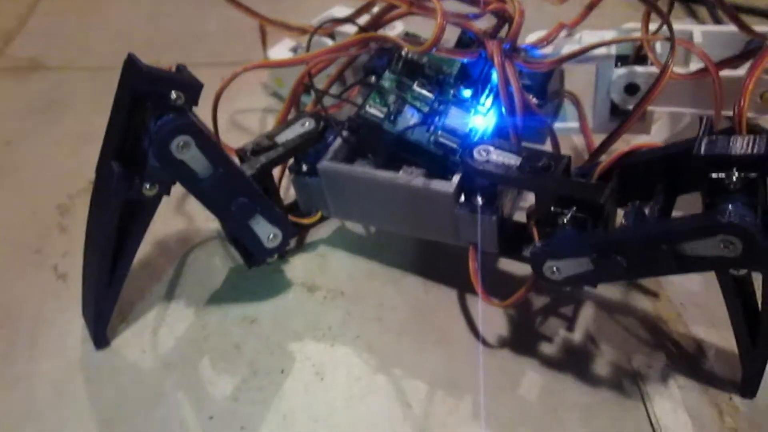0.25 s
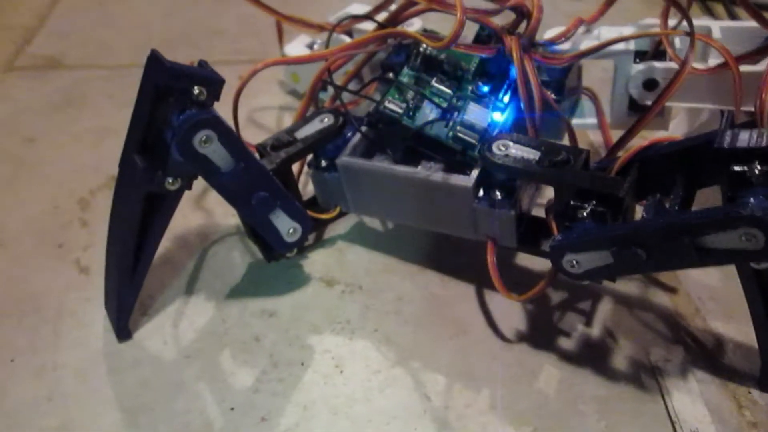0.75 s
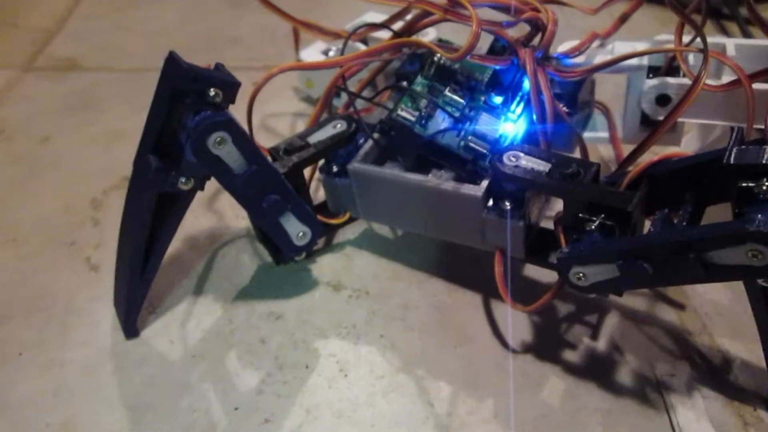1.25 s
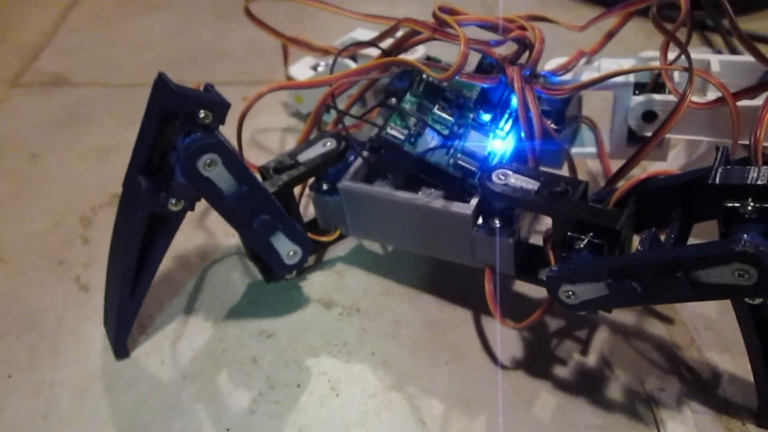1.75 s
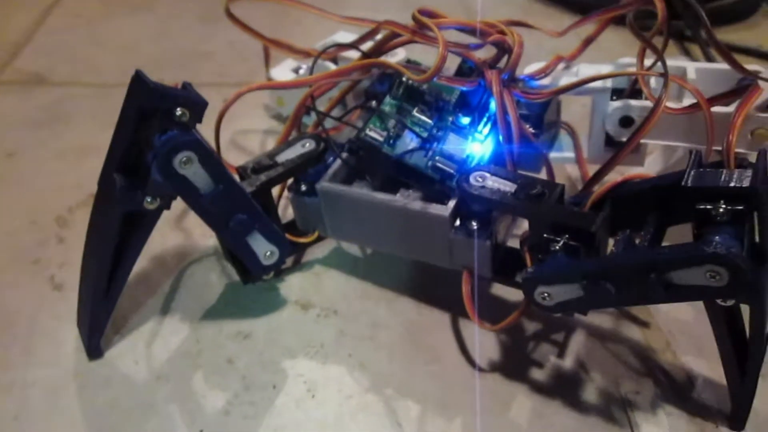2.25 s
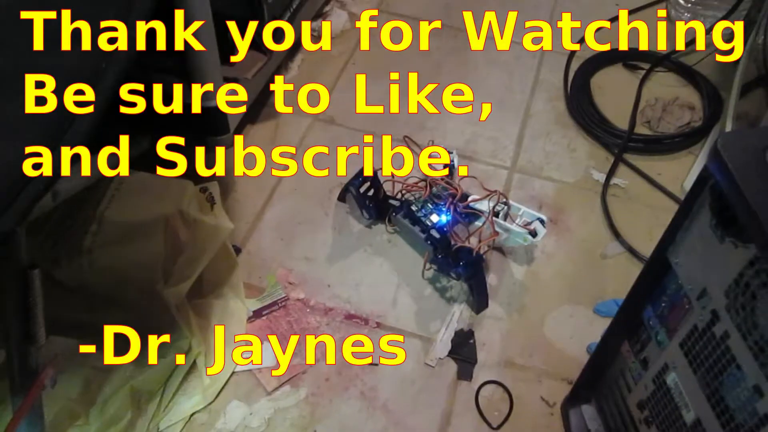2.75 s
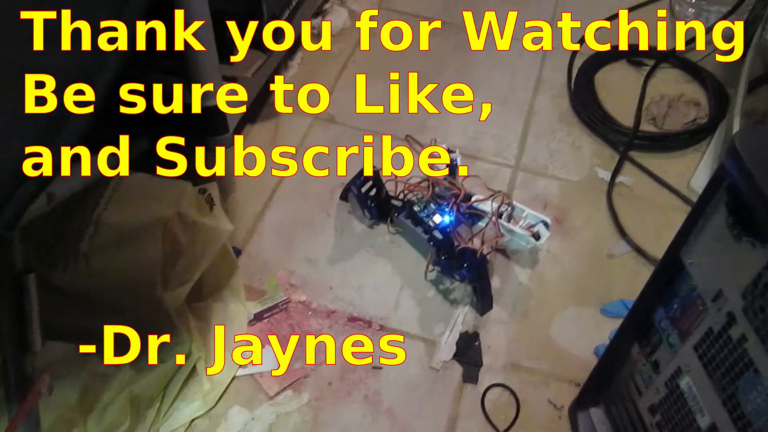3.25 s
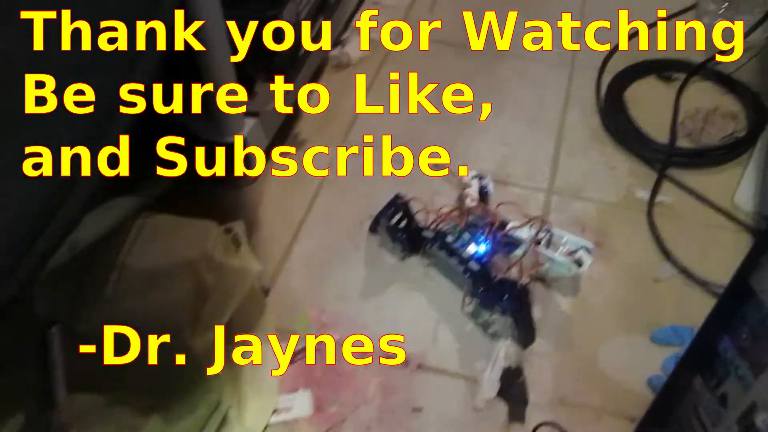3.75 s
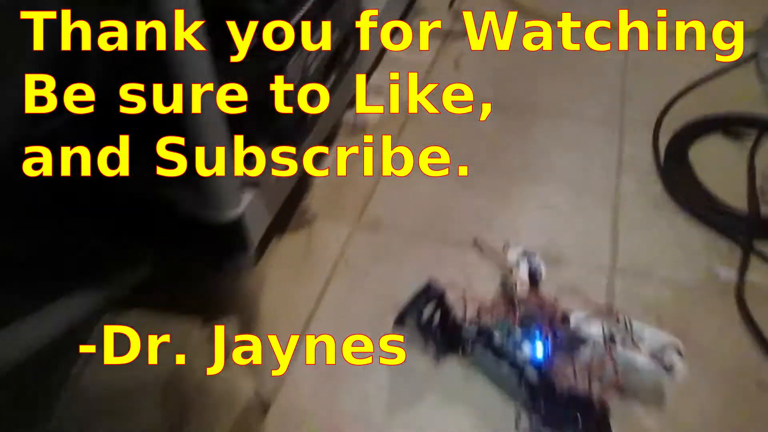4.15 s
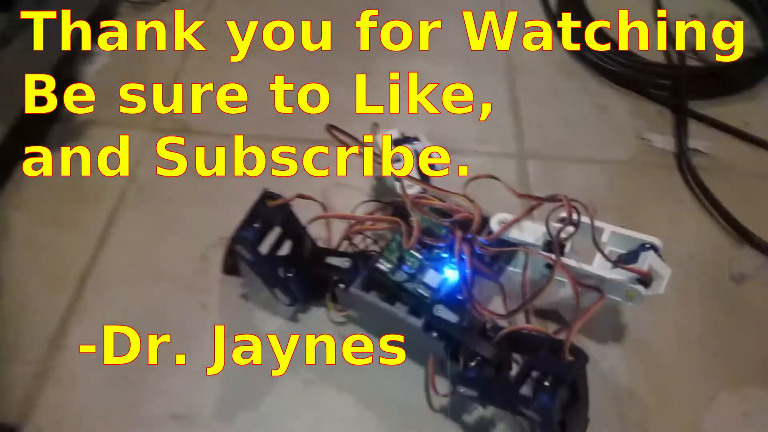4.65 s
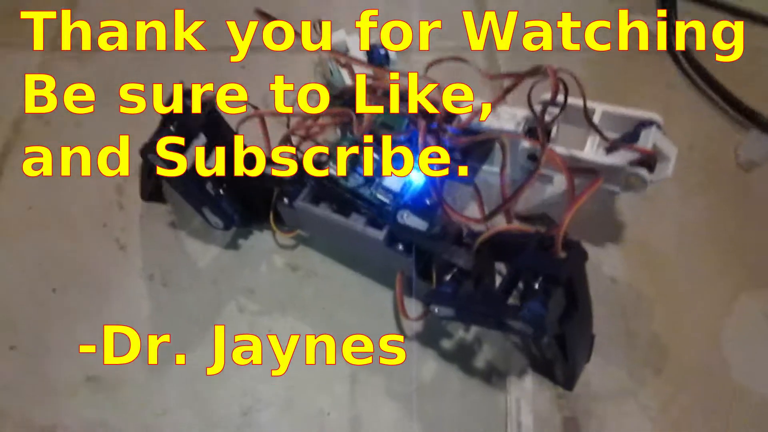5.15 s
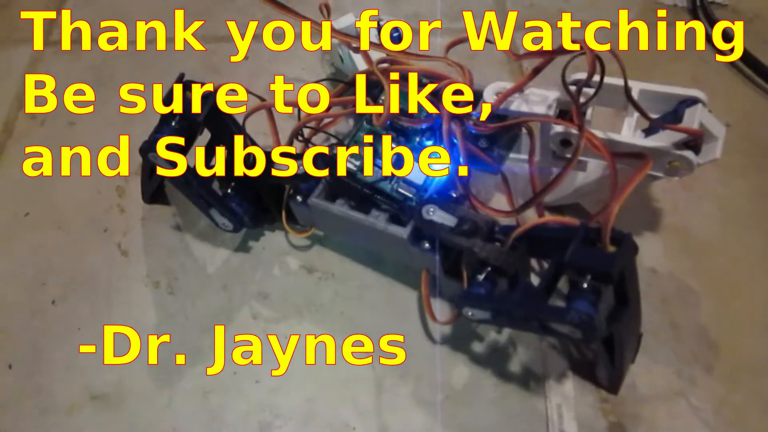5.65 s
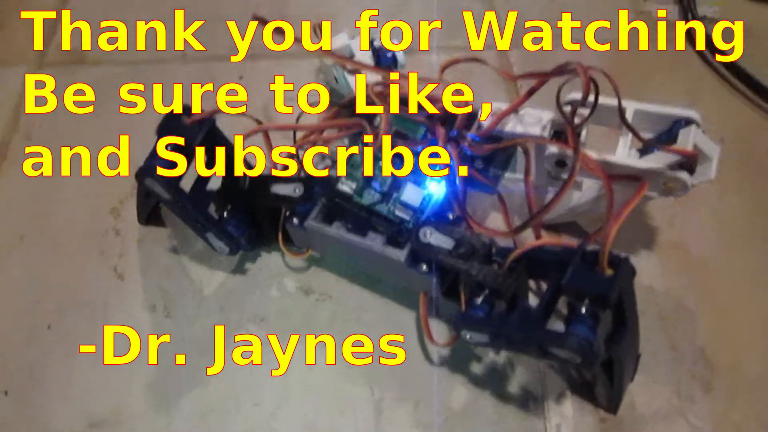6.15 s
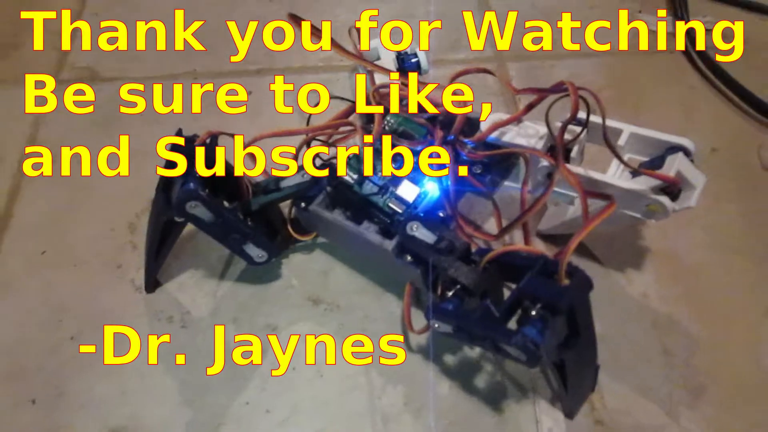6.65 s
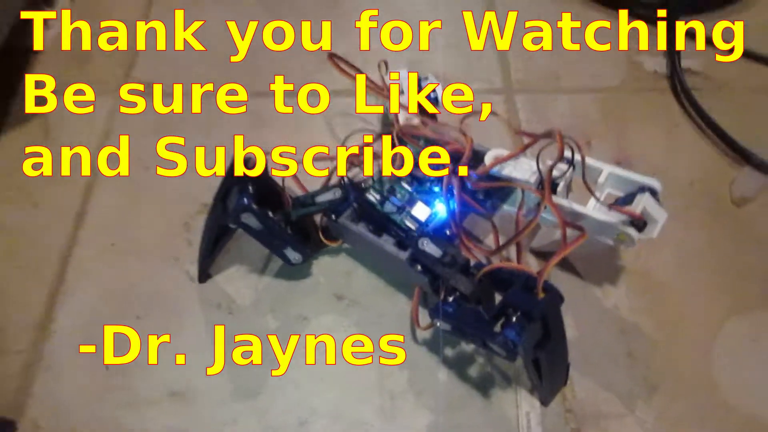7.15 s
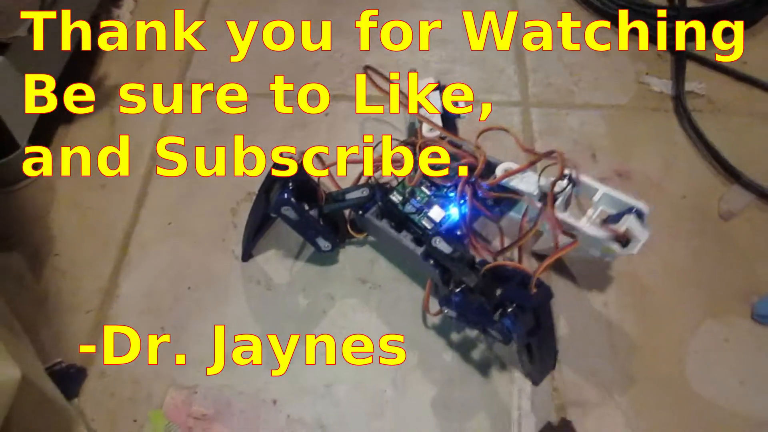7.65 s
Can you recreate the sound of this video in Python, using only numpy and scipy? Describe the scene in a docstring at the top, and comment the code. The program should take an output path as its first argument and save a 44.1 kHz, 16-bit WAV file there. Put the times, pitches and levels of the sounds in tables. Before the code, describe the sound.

Rough buzzing gear chatter, brief squeaks and ticks from a robot's little servos on a hard floor, with a dropout and sharp pop after two seconds.

```python
"""Small hobby servos hold the legs of a plastic robot on a hard floor and hunt about their positions.
From the start their gears chatter as dense clicks through the ringing cases, with short scrapes and
twitches of filtered noise; sine mains hum, a narrow rumble, room noise and faint hiss lie below.
After two seconds comes one short silence, ended by a square pop; then the servos go on to the end.
The steady chatter and background dip quickly at listed moments and creep back."""
import sys
import numpy as np
from scipy import signal
from scipy.fft import rfft, irfft, next_fast_len
from scipy.io import wavfile

SR = 44100
rng = np.random.default_rng(int(sys.argv[2]) if len(sys.argv) > 2 else 0)


def unload_audio(sound):
    """Save the sound as a 16-bit wav file, at the path given as the first command line argument."""
    columns = np.transpose(np.atleast_2d(sound))
    # keep every value between -1 and 1, then stretch to whole-number steps
    steps = np.round(np.clip(columns, -1, 1) * 32767)
    wavfile.write(sys.argv[1], SR, steps.astype(np.int16))


def nominal_scale(level):
    """Amplitude ratio for a level in decibels (scalar or array-like)."""
    x = np.asarray(level, float) / 20
    return 10 ** x


N = 347949

# where the microphone is: (t/s, share of the view from above 0-1, trim of the lowest hum line/dB,
# rumble relative to the background level/dB)
PLACE = [(0, 0.05, -7, 2.5), (1, 0, 1.5, -5), (2.2, 0, -2.5, 2), (2.4, 0.6, -6, -6.5), (3.5, 0.4, -4, -3),
         (4.4, 0.4, -3, 1.5), (4.9, 0.5, -2.5, -3), (5.1, .95, 2.5, -3.5), (6, 0.8, 0, 3), (6.8, 1, -1, -2),
         (7, 0.5, -3, 2.5), (7.89, 0.4, -1.5, -13)]


def rms_one(x):
    """Scale to unit rms."""
    return x / np.sqrt(np.mean(x ** 2) + 1e-20)


def in_time(rows):
    """Columns of a table, interpolated to one value per sample."""
    s, *columns = np.transpose(rows)
    return [np.interp(np.arange(N) / SR, s, column) for column in columns]


def coloured(x, spectrum):
    """Shape x by a spectrum of (f/Hz, level/dB), interpolated over log frequency; rms 1."""
    size = next_fast_len(N)
    hz = np.maximum(np.arange(size // 2 + 1) * SR / size, 1)
    at_hz, db = np.transpose(spectrum)
    gain = nominal_scale(np.interp(np.log(hz), np.log(at_hz), db))
    return rms_one(irfft(rfft(x, size) * gain, size)[:N])


def drift(rate_hz):
    """Slow random wander of rms 1: noise through two equal low-pass poles, run at SR / 40."""
    r = np.exp(-2 * np.pi * rate_hz * 40 / SR)
    noise = rng.standard_normal(N // 40 + 2002)
    slow = signal.lfilter([1], [1, -2 * r, r * r], noise)[2000:]   # drops the filter's settling
    return np.interp(np.arange(N) / 40, np.arange(len(slow)), rms_one(slow))


def resonance(x, hz, width_hz):
    """Two-pole resonance with a gain of about 1 at its peak."""
    r = np.exp(-np.pi * width_hz / SR)
    poles = [1, -2 * r * np.cos(2 * np.pi * hz / SR), r * r]
    return signal.lfilter([(1 - r * r) / 2, 0, (r * r - 1) / 2], poles, x)


def chatter():
    """Tooth contacts heard directly and through the cases, with a separate, finer bright edge."""
    # broad colour of the teeth: (f/Hz, relative level per Hz/dB)
    gear_colour = [(290, -44.5), (500, -4), (607, -14.5), (1100, -12), (1220, -3.5), (1710, -8.5),
                   (1990, -7.5), (3200, -6.5), (4160, -20.5), (7040, -120)]
    # their bright edge: (f/Hz, relative level per Hz/dB)
    edge_colour = [(2000, -27.5), (3000, -4), (3900, 0), (4600, -8), (5300, -2.5), (6000, -5), (7000, -18)]
    body_gain, edge_gain = gear_effort()
    teeth = tooth_contacts(per_s=4000, spread_db=3.0, kicks_per_s=35.0, kick=3.8, fade_s=0.0062, most=2.2)
    direct = coloured(teeth, gear_colour)
    through_case = rms_one(case(teeth))
    body = rms_one(direct + nominal_scale(6) * through_case)
    fine = tooth_contacts(per_s=6500, spread_db=3.5, kicks_per_s=66.0, kick=3.1, fade_s=0.012, most=6.2)
    edge = coloured(fine, edge_colour)
    return body_gain * body + edge_gain * edge


def tooth_contacts(per_s, spread_db, kicks_per_s, kick, fade_s, most):
    """Dense uneven clicks; each drive kick of a hunting motor swells them at once, up to a limit, then fades."""
    sizes = nominal_scale(spread_db * np.minimum(rng.exponential(1, N), 4)) * rng.choice([-1, 1], N)
    clicks = sizes * (rng.random(N) < per_s / SR)
    kicks = (rng.random(N) < kicks_per_s / SR) * rng.uniform(0, kick, N)
    swell = signal.lfilter([1], [1, -np.exp(-1 / (fade_s * SR))], kicks + 1e-18)
    drive = 1 + most * np.tanh(swell / most)
    return rms_one(clicks * drive)


def gear_effort():
    """Gains of the body and the bright edge: powers of dipping steady hunting and undipped scrapes add up."""
    # steady hunting of the gears, before the dips: (t/s, body level/dB, bright edge level/dB)
    hunting = [(0, -46, -50), (0.3, -31.5, -44), (0.5, -41, -47.5), (0.9, -36, -39.5), (1.02, -34.5, -50),
               (1.2, -35.5, -48), (1.36, -42.5, -46), (1.45, -35.5, -46), (1.9, -37.5, -45),
               (2.15, -37, -48), (2.45, -42, -47), (2.7, -43, -49.5), (3.2, -35.5, -39.5),
               (3.4, -39.5, -48), (3.58, -32, -39), (4.0, -37, -45.5), (4.12, -44, -47), (4.35, -35.5, -43),
               (4.9, -41, -45.5), (5.15, -36, -40.5), (6.0, -39, -56), (6.5, -33.5, -38.5),
               (6.76, -46.5, -49), (6.9, -33.5, -40.5), (7.45, -38.5, -51.5), (7.68, -34.5, -36),
               (7.76, -46, -54), (7.89, -37.5, -45)]
    # scrapes, when a leg is driven hard for a moment:
    # (start t/s, time to the fall/s, body level/dB, bright edge level/dB)
    scrapes = [(0.223, 0.086, -39.5, -53), (0.658, 0.016, -34.5, -45), (0.73, 0.038, -52, -28.5),
               (0.85, 0.055, -40, -40.5), (1.101, 0.042, -32.5, -44), (1.393, 0.069, -35, -43.5),
               (2.658, 0.018, -49, -42), (2.719, 0.058, -44.5, -44.5), (2.997, 0.037, -64, -41.5),
               (3.218, 0.046, -39, -43.5), (3.99, 0.066, -37.5, -58), (4.147, 0.038, -37.5, -54.5),
               (4.281, 0.065, -33.5, -51), (4.495, 0.035, -50, -30), (4.696, 0.02, -43, -50),
               (5.1, 0.043, -44, -49), (5.99, 0.068, -39, -32), (6.111, 0.032, -55, -33),
               (6.188, 0.046, -33, -37), (6.254, 0.043, -47.5, -38), (6.68, 0.038, -49, -48.5),
               (7.525, 0.044, -40.5, -27.5), (7.63, 0.041, -42, -46)]
    rise_s, fall_s = 0.014, 0.016
    t = np.arange(N) / SR
    power = (dips() * nominal_scale(np.array(in_time(hunting)))) ** 2
    for s, length, body_db, edge_db in scrapes:
        rise = np.clip((t - s) / rise_s, 0, 1)
        fall = np.exp(-np.maximum(t - s - length, 0) / fall_s)
        power = power + (rise * fall * nominal_scale(np.array([[body_db], [edge_db]]))) ** 2
    return np.sqrt(power)


def twitches():
    """A run of tooth slips starts with a knock and stops; long runs squeak on a narrow pitch, short ones tick."""
    # (t/s, peak level of the tone before the trim/dB, ringing pitch f/Hz, length scale/s)
    slip_runs = [(0.091, -26, 2120, 0.0077), (0.25, -21, 1920, 0.034), (0.327, -25, 2120, 0.0064),
                 (0.666, -19.5, 2020, 0.018), (0.722, -24.5, 1230, 0.016), (0.747, -20.5, 3090, 0.01),
                 (1.065, -25, 1270, 0.017), (1.0765, -20.5, 4050, 0.0052), (1.112, -20.5, 3860, 0.029),
                 (1.195, -30, 2000, .02), (1.322, -27, 1254, 0.012), (1.543, -27.5, 1310, 0.025),
                 (1.707, -24.5, 2270, 0.0093), (1.752, -25.5, 4030, 0.0056), (1.843, -25, 2040, 0.008),
                 (1.862, -21.5, 2030, 0.017), (1.902, -24.5, 2470, 0.019), (1.939, -22.5, 1250, 0.0096),
                 (2.024, -27, 2560, 0.0022), (2.069, -20, 3540, 0.004), (2.413, -33.5, 2550, 0.024),
                 (2.463, -37, 2430, 0.018), (2.663, -16.5, 3830, 0.0011), (2.68, -30, 670, 0.0097),
                 (2.71, -18.5, 4730, 0.0017), (2.738, -19, 3800, 0.0017), (2.75, -15, 4020, 0.004),
                 (2.76, -18, 3930, 0.0046), (2.991, -37, 1500, .002), (3.015, -39, 2750, 0.018),
                 (3.242, -27.5, 1950, 0.02), (3.608, -23, 1950, 0.021), (3.73, -25.5, 1940, 0.018),
                 (3.7596, -25.5, 2010, 0.0083), (3.793, -19, 1950, 0.0042), (3.885, -27.5, 2000, 0.02),
                 (3.99, -20.5, 2070, 0.015), (4.0184, -24.5, 1980, 0.011), (4.15, -24, 1780, 0.016),
                 (4.15, -30.5, 453, 0.072), (4.282, -32.5, 458, 0.08), (4.352, -25, 2040, 0.016),
                 (4.502, -25, 2210, 0.01), (4.518, -16.5, 4720, 0.017), (4.592, -29, 1550, 0.01),
                 (4.665, -27, 2960, 0.019), (4.695, -20.5, 1780, 0.0083), (4.763, -25.5, 1220, 0.018),
                 (4.887, -27, 1840, 0.01), (5.0285, -26, 1550, 0.032), (5.211, -23, 1900, 0.023),
                 (5.459, -23, 1540, 0.022), (5.581, -27, 1440, 0.023), (5.745, -30, 1590, .01),
                 (5.825, -24.5, 1580, 0.025), (5.89, -24, 1900, 0.014), (5.961, -22.5, 1580, 0.018),
                 (6.027, -20, 3930, 0.021), (6.126, -36, 3830, 0.0066), (6.136, -29, 2950, 0.033),
                 (6.188, -23.5, 3160, 0.015), (6.206, -18.5, 5360, 0.025), (6.2131, -18, 2930, 0.041),
                 (6.2615, -25, 1770, 0.026), (6.2616, -16, 5050, 0.025), (6.277, -36, 4660, 0.0098),
                 (6.556, -29.5, 1520, 0.011), (6.6745, -16.5, 4040, 0.018), (6.847, -29, 1850, 0.01),
                 (6.917, -25.5, 1920, 0.019), (7.025, -28, 1920, 0.013), (7.088, -28, 2940, 0.012),
                 (7.132, -27, 1970, 0.011), (7.186, -28.5, 1860, 0.016), (7.351, -29, 1840, .018),
                 (7.526, -21, 3650, 0.0013), (7.657, -24, 2940, 0.019)]
    trim_db = -5.0
    tones, rasp, span = np.zeros(N), np.zeros(N), round(.12 * SR)
    t = np.arange(span) / SR
    for s, db, hz, length in slip_runs:
        run = np.exp(-(t / (1.31 * length)) ** 4)
        knock = np.exp(-t / 0.0012)
        slips = rng.standard_normal(span) * (run + knock)
        width_hz = np.clip(2.4 / length, 0.029 * hz, 900)   # longer runs ring more narrowly
        tone = rms_one(resonance(slips, hz, width_hz))
        # the teeth rasp broadly around that pitch, less in long runs
        broad = rms_one(resonance(slips, 1.28 * hz, 0.78 * hz))
        at, gain = round(s * SR), nominal_scale(db + trim_db) / np.abs(tone).max()
        tones[at:at + span] += gain * tone[:N - at]
        rasp[at:at + span] += gain * np.exp(-length / .04) * broad[:N - at]
    return tones + nominal_scale(-2) * rasp + nominal_scale(-16.5) * case(rasp)


def case(shakes):
    """Resonances of the cases and legs, whose balance follows the view and wavers slowly."""
    # (f/Hz, width/Hz, relative level from the side/dB, relative level from above/dB)
    modes = [(444.6, 11, -9.5, -22), (814, 53, -11.5, -11.5), (988, 100, -9.5, -6.5), (1230, 49, -2, -11),
             (1580, 110, -19, 3.5), (1913, 110, -4.5, 1.5), (2046, 120, 1, -13), (2292, 150, -4.5, -13.5),
             (2480, 41, -5.5, -14), (2640, 45, -5, 0), (3034, 57, -8, -16), (3830, 43, -13, -16.5)]
    above = np.clip(in_time(PLACE)[0], 0, 1)
    ringing = np.zeros(N)
    for hz, width_hz, side_db, top_db in modes:
        gain = nominal_scale(side_db + above * (top_db - side_db) + 1.1 * drift(7.4))
        level_fix = np.sqrt(SR / np.pi / width_hz)   # broad shaking keeps its level at any width
        ringing += gain * resonance(shakes, hz, width_hz) * level_fix
    return ringing


def dips():
    """Gain of the steady sound: the deepest dip under way rules; each falls fast and recovers slowly."""
    # at the sound's return and around loud twitches or scrapes: (t/s, nominal depth/dB)
    drops = [(0.68, 2.5), (0.77, 5), (1.12, 4), (2.069, 7), (2.38, 12.5), (2.763, 21.5), (3.8, 4.5),
             (4.539, 5.5), (6.039, 11.5), (6.2, 16), (6.29, 14), (6.69, 7.5), (7.56, 2)]
    fall_s, recovery_s = 0.0085, 0.35
    t = np.arange(N) / SR
    depths = []
    for s, db in drops:
        fall = np.clip((t - s) / fall_s, 0, 1)
        recovery = np.exp(-np.maximum(t - s, 0) / recovery_s)
        depths.append(db * fall * recovery)
    return nominal_scale(-np.max(depths, axis=0))


def background():
    """Hum sines, a narrow rumble and broad room noise share one level; hum and rumble vary with the place."""
    # mains hum: (f/Hz, level relative to the background/dB, wavering/dB)
    hum_lines = [(120, 0, 1.5), (240, 0, .6), (480, -15, 2.0)]
    # room noise: (f/Hz, relative level per Hz/dB)
    air_colour = [(15, -33), (25, -8), (43, -13), (114, 0), (177, -5), (239, -1), (287, -2.5), (397, -8),
                  (1090, -10), (1900, -11), (2280, -16), (3880, -13), (5000, -17), (6000, -27),
                  (7000, -17.5)]
    background_db, air_db = -43, 3   # the air is relative to the background
    rumble_hz, rumble_width_hz = 77.1, 8.5
    t = np.arange(N) / SR
    _, low_hum_db, rumble_db = in_time(PLACE)
    lines = []
    for hz, db, waver_db in hum_lines:
        level = np.sqrt(2) * nominal_scale(db + waver_db * drift(6.1))   # sqrt(2) turns rms into peak
        lines.append(level * np.sin(2 * np.pi * (hz * t + rng.random())))
    hum = nominal_scale(low_hum_db) * lines[0] + sum(lines[1:])
    white = rng.standard_normal((2, N))
    narrow = resonance(white[0], rumble_hz, rumble_width_hz)
    rumble = rms_one(resonance(narrow, rumble_hz, 2 * rumble_width_hz))
    air = coloured(white[1], air_colour)
    return nominal_scale(background_db) * dips() * (hum + nominal_scale(rumble_db) * rumble + nominal_scale(air_db) * air)


def scene():
    """All sources, mono."""
    return (chatter() + twitches() + background())[None]


def low_pass(x):
    """Removes everything above the highest recorded frequency."""
    return signal.sosfilt(signal.butter(12, 15500, fs=SR, output="sos"), x)


def record(dry):
    """A narrow-band microphone with hiss and a small offset; a silence, then a square pop as sound returns."""
    cutoff_hz, rolloff_hz = 6780, 4690
    hiss_db, offset = -54.5, -.0016   # the hiss level is before the filters
    silence_start_s, silence_end_s = 2.1975, 2.3634
    pop_end_s, pop_height = 2.37055, -.351
    t = np.arange(N) / SR
    x = dry + nominal_scale(hiss_db) * rng.standard_normal(N)   # steady hiss of the electronics
    x = signal.sosfilt(signal.cheby2(24, 60, cutoff_hz, fs=SR, output="sos"), x)
    # the capsule fades above its range
    x = signal.sosfilt(signal.butter(6, rolloff_hz, fs=SR, output="sos"), x) + offset
    fade_out = np.clip((silence_start_s - t) / .002, 0, 1)   # a quick fade into the silence
    x = x * np.maximum(fade_out, t >= silence_end_s)
    pop = pop_height * ((t >= silence_end_s) & (t < pop_end_s))
    x = x + signal.lfilter([.6], [1, -.4], pop)   # slightly rounded edges
    return low_pass(x)


dry = scene()
out = record(dry)
unload_audio(out)
```